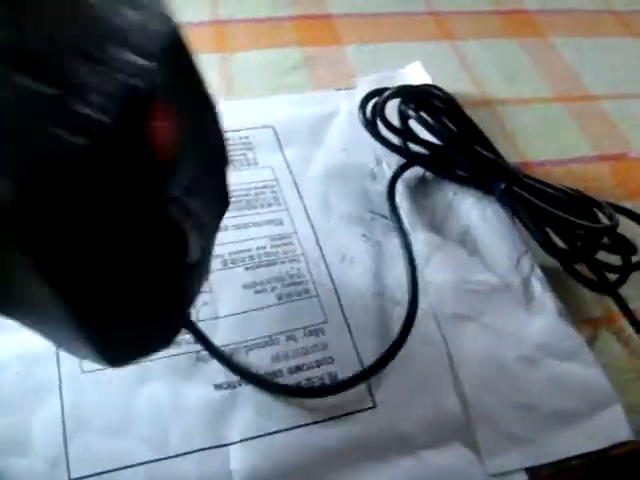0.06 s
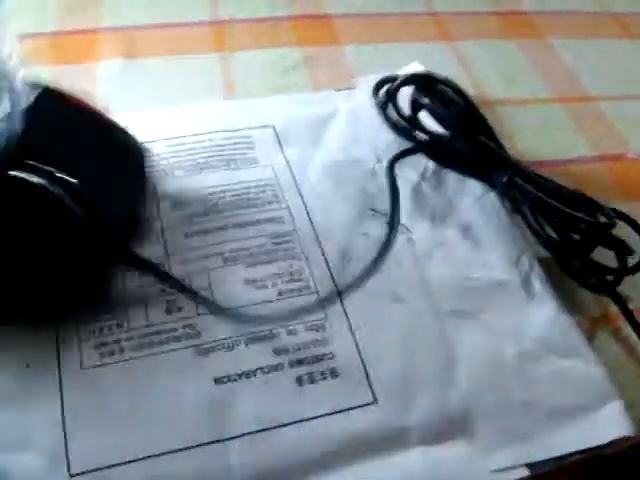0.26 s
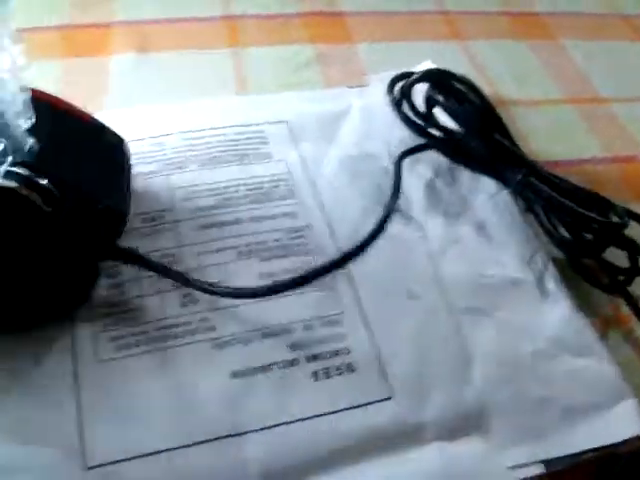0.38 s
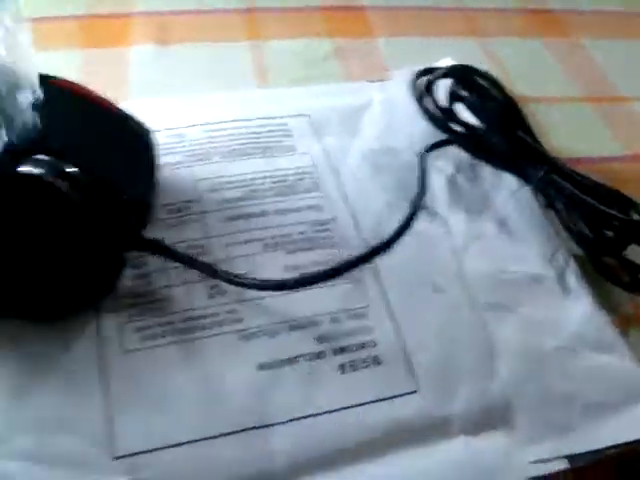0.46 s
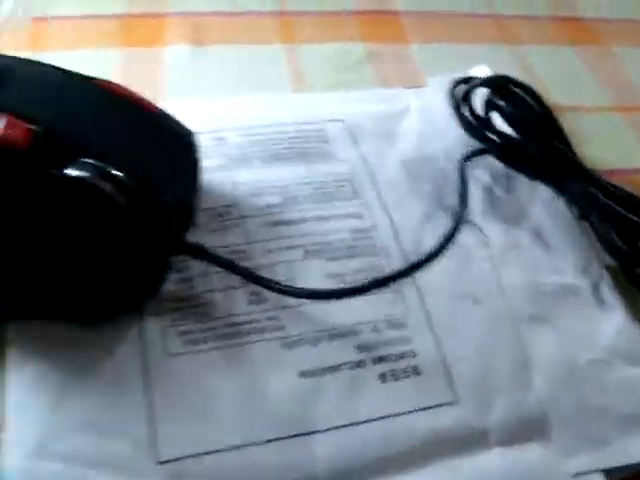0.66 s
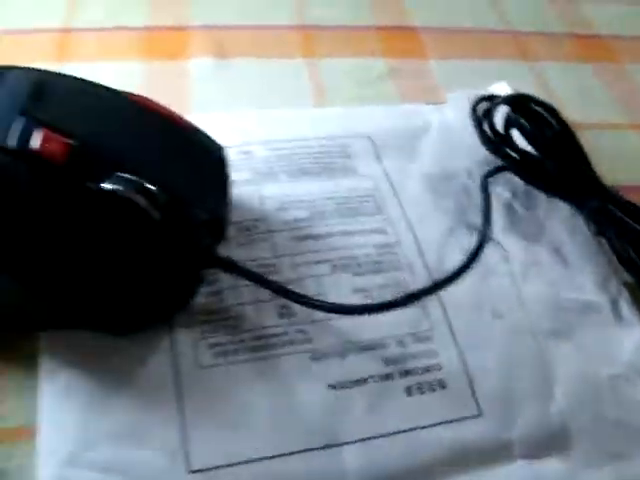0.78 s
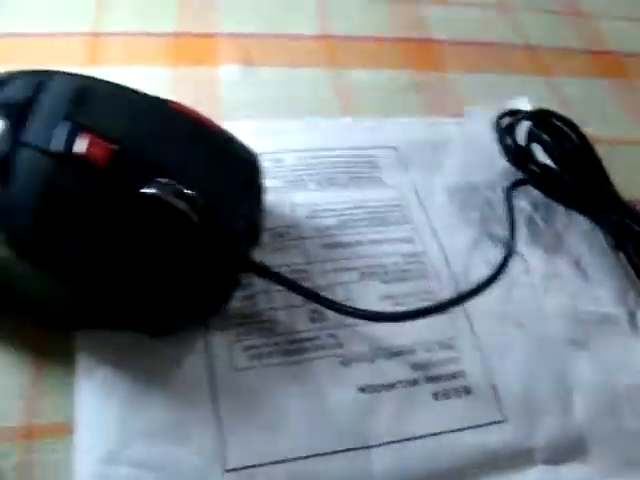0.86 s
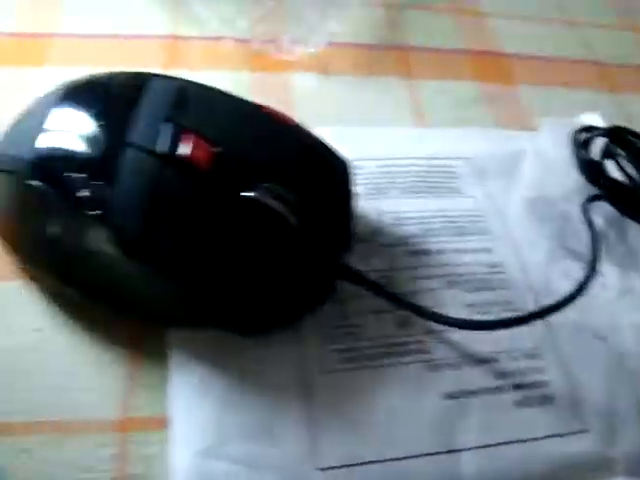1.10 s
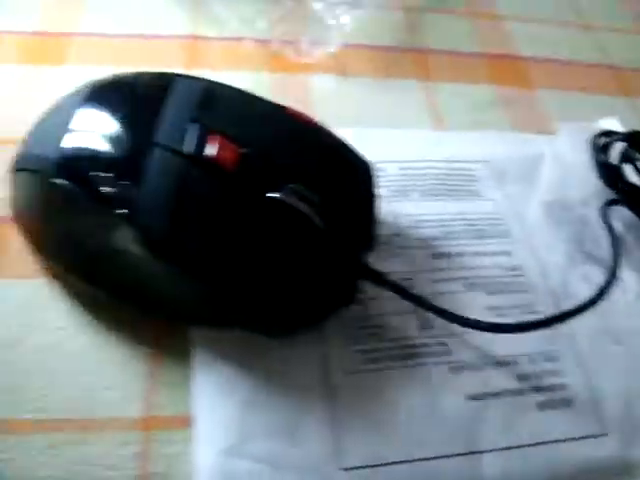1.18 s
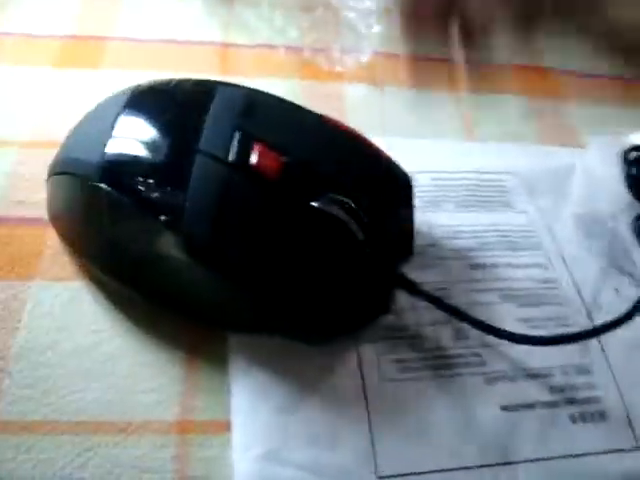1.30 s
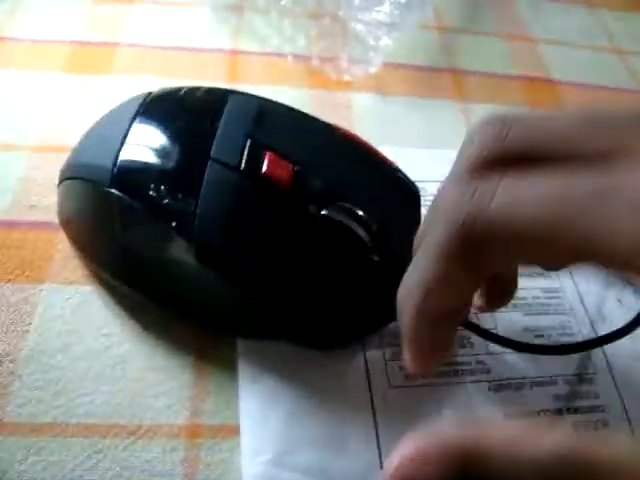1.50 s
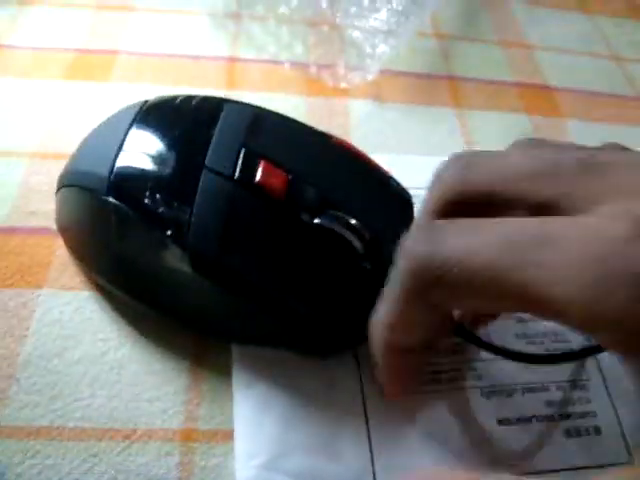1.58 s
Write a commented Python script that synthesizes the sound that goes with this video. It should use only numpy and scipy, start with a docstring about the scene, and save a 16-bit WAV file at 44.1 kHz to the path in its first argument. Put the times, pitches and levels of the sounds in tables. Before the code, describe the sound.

A computer mouse lands with a rattling double thump on plastic wrapping on a table, just after a short scrape. The wrapping settles with faint crinkles and fingertips touch it softly, near the microphone in a quiet room.

```python
"""A mouse set down on a package

In a quiet room a computer mouse slides over a paper-labelled plastic package on a table, with a hiss
of friction. It lands on one edge, its shell clattering, then drops flat with a second thump; both
blows set table, mouse and room ringing briefly. The wrapping settles with faint ticks, and a hand
comes back to it with soft taps and a crinkle."""
import sys
import numpy as np
from scipy import signal
from scipy.fft import rfft, irfft, next_fast_len
from scipy.io import wavfile

SR = 44100
rng = np.random.default_rng(int(sys.argv[2]) if len(sys.argv) > 2 else 0)


def to_wav(sig):
    """Store sig (one row per channel, or 1-D mono) as 16-bit WAV at the path in sys.argv[1].

    Samples outside -1..1 are clipped; the rate is SR.
    """
    pcm = np.clip(np.atleast_2d(sig), -1, 1) * 32767
    pcm = np.round(pcm).astype(np.int16)
    wavfile.write(sys.argv[1], SR, pcm.T)  # frames by channels


N = 72765


def from_db(db):
    """Decibels to gain."""
    return 10 ** (np.asarray(db) / 20)


def unit_rms(x):
    """Scale to unit power."""
    return x / np.sqrt(np.mean(x ** 2) + 1e-20)


def seconds():
    """Time of every sample."""
    return np.arange(N) / SR


def fader(curve):
    """Gain that rides a curve of (time [s], level [dB])."""
    return from_db(np.interp(seconds(), *np.transpose(curve)))


def at_hz(table, hz):
    """Read a table's other columns along its first, on a log-frequency axis."""
    freqs, *columns = np.transpose(table)
    return [np.interp(np.log(np.maximum(hz, 1)), np.log(freqs), column) for column in columns]


def coloured(noise, colour):
    """EQ white noise to a curve of (frequency [Hz], level [dB]), keeping its power."""
    size = next_fast_len(N + SR // 10)
    db, = at_hz(colour, np.fft.rfftfreq(size, 1 / SR))
    return irfft(rfft(noise, size) * unit_rms(from_db(db)), size)[:N]


def decay(start, t60):
    """Envelope with an instant attack and an exponential tail."""
    age = seconds() - start
    return (age >= 0) * np.exp(-np.log(1000) * np.clip(age / t60, 0, 10))


def bursts(hits, colour):
    """Short noise bursts of one colour, from rows of (time [s], level [dB], t60 [s])."""
    power = sum((from_db(db) * decay(start, t60)) ** 2 for start, db, t60 in hits)
    return coloured(np.sqrt(power) * rng.standard_normal(N), colour)


def diffuse(table):
    """Response of countless modes: third-octave bands of noise, each dying at its own rate."""
    edges_hz = 22 * 2 ** (np.arange(28) / 3)
    white = rng.standard_normal((2, N))   # neighbouring bands draw on different noise
    response = np.zeros(N)
    for k, (low, high) in enumerate(zip(edges_hz, edges_hz[1:])):
        db, t60 = at_hz(table, np.sqrt(low * high))
        envelope = decay(0, t60)
        bandpass = signal.butter(2, [low, high], "band", fs=SR, output="sos")
        band = signal.sosfilt(bandpass, white[k % 2] * envelope)
        band_rms = np.sqrt(np.mean(envelope ** 2) * 2 * (high - low) / SR)
        response += from_db(db) * band_rms * unit_rms(band)
    return response


def room_tone():
    """A steady bed of room air and microphone hiss, with a faint hum."""
    # hum tones: (frequency [Hz], level [dB])
    hum_tones = [(240, -57), (487, -57)]
    # colour of air and hiss: (frequency [Hz], level [dB])
    air_colour = [(30, -13), (90, -10.5), (150, -4.5), (240, -2.5), (450, -7.5), (700, -10.5), (1200, -13),
                  (2200, -23.5), (5500, -27.5), (7200, -15), (8500, -32.5), (10000, -25)]
    hum = sum(from_db(db) * np.sin(2 * np.pi * (hz * seconds() + rng.random())) for hz, db in hum_tones)
    return hum + from_db(-48.5) * coloured(rng.standard_normal(N), air_colour)


def handling():
    """Dull noise that comes and goes as the hand moves."""
    # its swells: (time [s], level [dB])
    swells = [(0, -44.5), (.2, -48), (.6, -48.5), (.85, -71), (1.0, -54), (1.15, -60), (1.24, -51.5),
              (1.29, -75), (1.325, -51.5), (1.36, -58), (1.44, -61), (1.47, -48.5), (1.55, -63),
              (1.65, -46)]
    # its muffled colour: (frequency [Hz], level [dB])
    colour = [(80, -19.5), (250, -16), (600, -8), (1000, -5.5), (1700, -17.5), (4000, -27), (10000, -25.5)]
    return fader(swells) * coloured(rng.standard_normal(N), colour)


def crinkle(slips_per_s=1400, spread_db=8, catches_per_s=310):
    """The wrapping catches unevenly under mouse and hand: tiny slips over a friction hiss."""
    # swells of the crinkling: (time [s], level [dB])
    swells = [(.23, -72), (.26, -35.5), (.33, -32), (.39, -39.5), (.48, -54.5), (.78, -53), (.95, -52.5),
              (1.06, -49), (1.155, -45.5), (1.185, -61), (1.56, -64), (1.6, -61), (1.65, -50)]
    # colour of the rubbed wrapping: (frequency [Hz], level [dB])
    colour = [(60, -5.5), (250, 5.5), (800, -6.5), (2000, -1.5), (3000, 0.5), (4500, -0.5), (6000, -1.5),
              (7200, -1), (10000, -5)]
    sizes = from_db(spread_db * np.minimum(rng.exponential(1, N), 4)) * rng.choice([-1, 1], N)
    slips = unit_rms(sizes * (rng.random(N) < slips_per_s / SR))
    catch_db = 1.5 * np.interp(seconds() * catches_per_s, np.arange(N), rng.standard_normal(N))
    friction = from_db(catch_db) * (from_db(1.5) * slips + rng.standard_normal(N))
    return fader(swells) * coloured(unit_rms(friction), colour)


def finger_taps(t60=.019):
    """Fingertips touch down softly on the package."""
    # touches: (time [s], level [dB])
    taps = [(1.5914, -1), (1.6035, -4), (1.6111, -2), (1.6142, -2)]
    # colour of a touch: (frequency [Hz], level [dB])
    colour = [(150, -8), (600, -19), (1200, -2), (2200, -12), (5000, -11), (9000, -23)]
    return from_db(-38) * bursts([(start, db, t60) for start, db in taps], colour)


def wrapping_ticks(t60=.013):
    """The wrapping settles in small, bright ticks."""
    # ticks: (time [s], level [dB])
    ticks = [(0.346, -1.5), (.3860, 10), (0.446, 1), (0.5216, -1), (0.594, -2.5), (0.6789, -3.5),
             (0.848, -7.5), (0.9513, 1), (0.9797, -6)]
    # their thin colour: (frequency [Hz], level [dB])
    colour = [(500, -22), (2000, -13), (4300, 2.5), (6000, -2.5), (10000, -9.5)]
    return from_db(-36.5) * bursts([(start, db, t60) for start, db in ticks], colour)


def slide():
    """Smooth friction hiss as the mouse is lowered over the wrapping, ending in a scuff."""
    # swell of the slide: (time [s], level [dB])
    swell = [(0, -38), (.06, -34), (.125, -33.5), (.168, -33.5), (.182, -35), (.215, -31.5), (.23, -50),
             (.26, -82)]
    # colour of its hiss: (frequency [Hz], level [dB])
    hiss_colour = [(60, -9), (250, -3), (800, -1.5), (2000, -2.5), (3000, 1), (4500, -3.5), (6000, -1.5),
                   (7200, -3.5), (10000, -6.5)]
    # scuffs just before the landing: (time [s], level [dB], t60 [s])
    scuffs = [(.1862, 3.5, 0.023), (.1938, -2, 0.037), (.1985, -3.5, 0.085)]
    # their colour: (frequency [Hz], level [dB])
    scuff_colour = [(150, -6.5), (700, -1.5), (1600, 3), (2400, -4), (3500, 0), (6000, -5), (10000, -12.5)]
    hiss = fader(swell) * coloured(rng.standard_normal(N), hiss_colour)
    return hiss + from_db(-25) * bursts(scuffs, scuff_colour)


def shell_rattle():
    """The mouse's shell and buttons clatter as it lands."""
    # clacks: (time [s], level [dB], t60 [s])
    clacks = [(.2337, 3, 0.017), (.2393, -4, 0.11), (.2475, -3.5, .06), (.2556, -1, 0.09),
              (.2594, -1, 0.013), (.2620, 8, 0.045), (.2677, -18, 0.029), (.2729, 6.5, 0.018),
              (.2840, -2, 0.045), (.3050, 1, 0.059), (.3088, -9.5, 0.028), (.3180, -5.5, 0.055),
              (.3395, -3, 0.036), (.3528, 5, 0.012), (.3582, 0, 0.042)]
    # colour of the shell: (frequency [Hz], level [dB])
    colour = [(100, -32), (300, -19), (700, 1.5), (1450, 3.5), (2000, -1.5), (3000, -3.5), (4500, -4.5),
              (6500, -9.5), (10000, -14.5)]
    return from_db(-17.5) * bursts(clacks, colour)


def wall_echo(sound, delay_s=.046, band_hz=(180, 1200)):
    """One dull slap off a wall, without deep bass or treble."""
    late = np.interp(seconds() - delay_s, seconds(), sound, left=0)
    bandpass = signal.butter(2, band_hz, "band", fs=SR, output="sos")
    return from_db(-16.5) * signal.sosfilt(bandpass, late)


def contact(impulse, hz, q=1):
    """The springy contact passes the lows, rings a little and cuts the highs."""
    w = 2 * np.tan(np.pi * hz / SR)
    return signal.lfilter(*signal.bilinear([w * w], [1, w / q, w * w]), impulse + 1e-18)


def ring(force, hz, t60):
    """One mode: a unit push starts a decaying sine of height 1."""
    damping = np.exp(-np.log(1000) / (t60 * SR))
    w = 2 * np.pi * hz / SR
    return signal.lfilter([0, np.sin(w)], [1, -2 * damping * np.cos(w), damping ** 2], force + 1e-18)


def thumps():
    """Edge and flat blows ring the modes in different balances; all drive a dense knock and the room."""
    # blows: (time [s], level [dB], contact brightness [Hz], flatness [0 = on edge, 1 = flat])
    blows = [(0.2556, -14, 2600, 0.92), (.2591, 0, 1510, 0), (0.264, -10.5, 2480, 0.56),
             (0.2659, -12.5, 2430, 0.56), (0.307, -25.5, 1800, .3), (.3513, 3, 1890, 0.93),
             (0.361, -13.5, 1700, 1)]
    # modes of table and mouse: (frequency [Hz], edge level [dB], flat level [dB], t60 [s])
    body_modes = [(132.94, -28, -41, 0.87), (266.3, -33, -31.5, 0.75), (329.3, -28, -30.5, 1),
                  (349.5, -21, -23.5, 0.52), (411, -3, -27, 0.018), (444.5, -31, -30.5, 0.16),
                  (689, -4, -25.5, 0.064), (694, -23, -19, 0.19), (878, -61, -16.5, 0.13),
                  (946, -8, -5, 0.029), (1142, -36, -25.5, 0.28), (1139, -27, -17.5, .05),
                  (1319, -40, -23.5, 0.13)]
    # their dense, quickly damped knock: (frequency [Hz], level [dB], t60 [s])
    knock = [(30.3, -29, .06), (90, -6.5, 0.076), (250, 8.5, 0.076), (700, -2.5, 0.052), (1140, 2, 0.071),
             (1800, -9.5, 0.11), (4020, 1.5, .06), (10000, -6, 0.042)]
    # the room's reverb: (frequency [Hz], level [dB], t60 [s])
    reverb = [(61, -34, .55), (96, -36, .5), (142, -22, .55), (191, -4.5, 1), (305, 8.5, 0.68),
              (520, 5.5, 0.64), (1113, -1, 0.64), (1700, -10, 0.42), (3960, -2.5, 0.34), (10000, -19, .3)]
    edge, flat = np.zeros((2, N))
    for start, db, brightness_hz, flatness in blows:
        impulse = from_db(db) * (np.arange(N) == int(start * SR))
        push = contact(impulse, brightness_hz)
        edge += (1 - flatness) * push
        flat += flatness * push
    ringing = sum(ring(from_db(edge_db) * edge + from_db(flat_db) * flat, hz, t60)
                  for hz, edge_db, flat_db, t60 in body_modes)
    response = from_db(-6.5) * diffuse(knock) + from_db(-14.5) * diffuse(reverb)
    return ringing + signal.fftconvolve(edge + flat, response)[:N]


def scene():
    """The mono mix at one close microphone."""
    landing = thumps()
    clicks = shell_rattle() + wrapping_ticks() + finger_taps()
    friction = slide() + crinkle() + handling()
    return (landing + wall_echo(landing) + clicks + friction + room_tone())[None]


def record(dry, ceiling=.7, cutoff_hz=10080):
    """The loudest peaks clip softly, then a steep low-pass cuts the top."""
    clipped = dry / (1 + (dry / ceiling) ** 6) ** (1 / 6)
    lowpass = signal.ellip(12, .2, 70, cutoff_hz, fs=SR, output="sos")
    return signal.sosfilt(lowpass, clipped)


dry = scene()
out = record(dry)
to_wav(out)
```